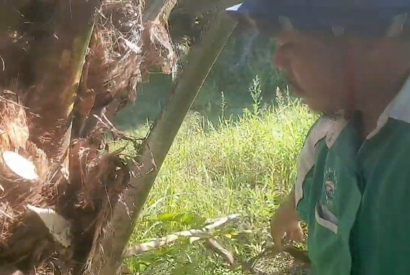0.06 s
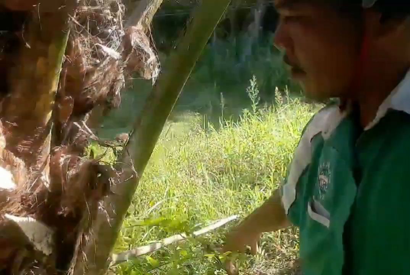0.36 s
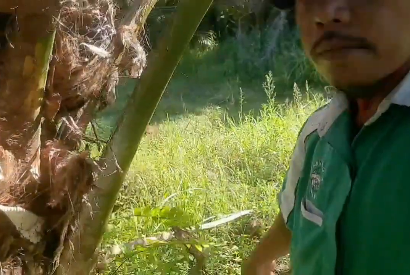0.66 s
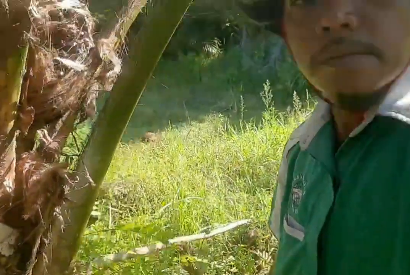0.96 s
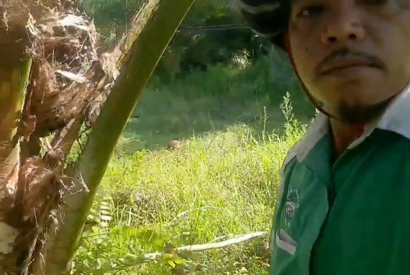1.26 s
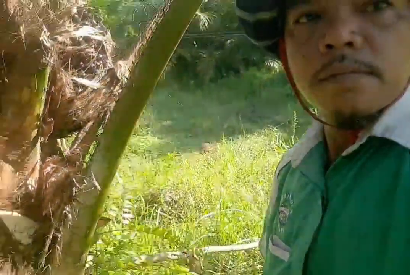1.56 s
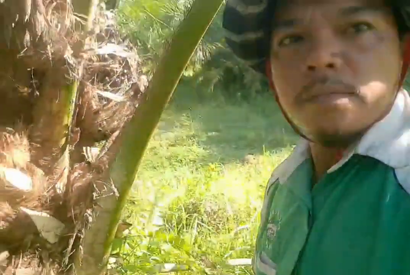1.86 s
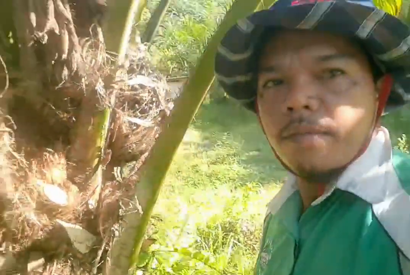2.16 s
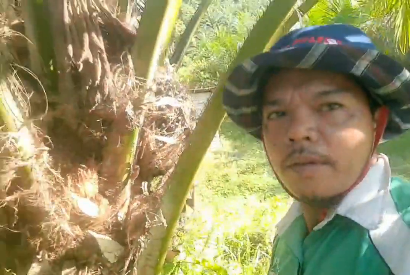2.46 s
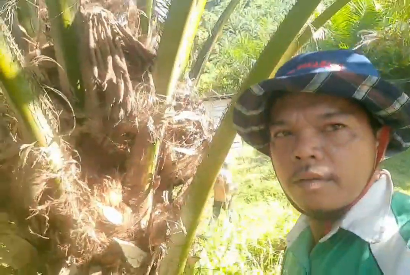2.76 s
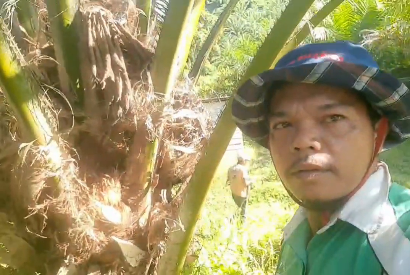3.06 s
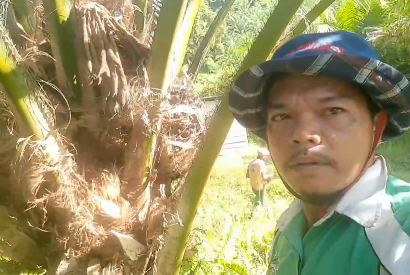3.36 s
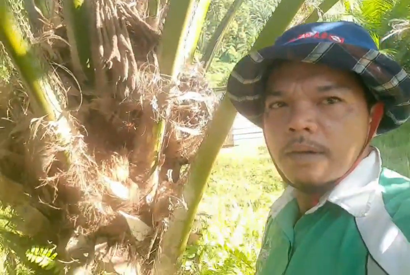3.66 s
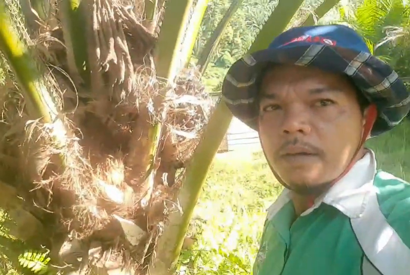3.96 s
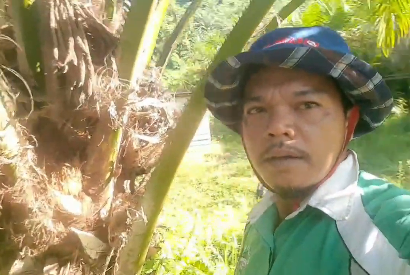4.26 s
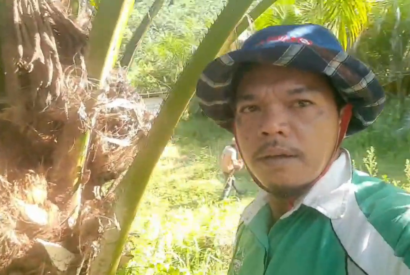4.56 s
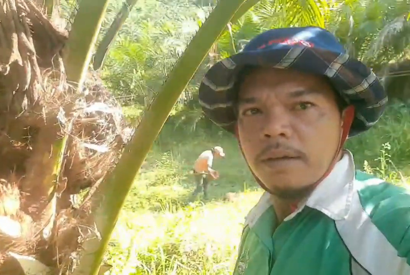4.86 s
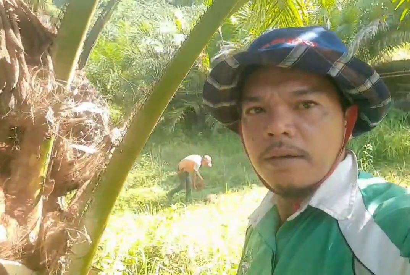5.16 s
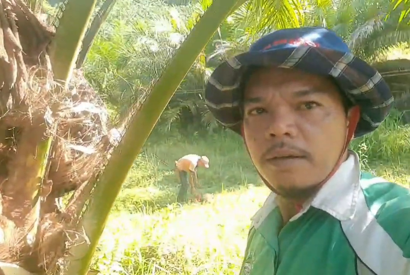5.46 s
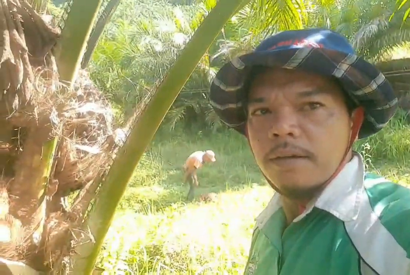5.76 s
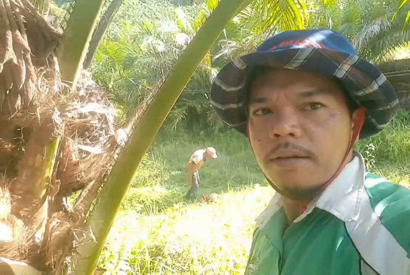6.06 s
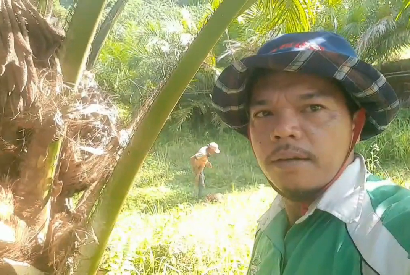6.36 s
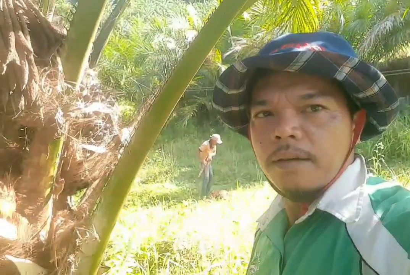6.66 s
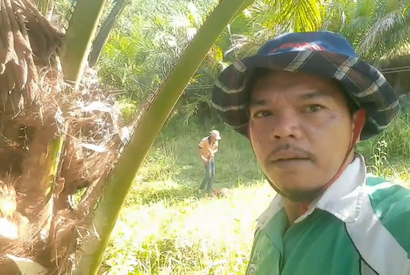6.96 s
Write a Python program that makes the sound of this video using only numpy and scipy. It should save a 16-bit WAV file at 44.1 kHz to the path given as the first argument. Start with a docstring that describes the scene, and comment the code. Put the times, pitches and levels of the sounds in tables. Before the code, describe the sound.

A close bird sings a thin, held whistle capped by a whip-like flick four times, adding a fast trill after the first and fourth, and just starts a fifth. Palm trunks scatter short echoes. Fingers on the phone make low rumbles, scuffs, one sharp early click and a cluster of heavier bumps late on. Behind it all, crickets pulse, distant birds chirp faintly and a soft rustling hiss gradually settles.

```python
"""Crickets, far birds and a soft rustling hiss fill a palm grove. Near by, a bird holds a thin whistle
and ends it in a whip; the hand on the phone makes one sharp click, and a fast trill follows.
Whistle and whip come twice more, scattered by trunks and fronds, over low bumps and scuffs of the hand.
The rustle settles, the heaviest bumps fall near 5.5 s, and the bird gives whistle, whip and trill again.
A fifth whistle has just begun at the end."""
import sys
import numpy as np
from scipy import signal
from scipy.fft import rfft, irfft, next_fast_len
from scipy.io import wavfile
from scipy.ndimage import uniform_filter1d, map_coordinates

SR = 44100
rng = np.random.default_rng(int(sys.argv[2]) if len(sys.argv) > 2 else 0)


def store_wav(level_fs):
    """Save 16-bit WAV to argv[1]."""
    pcm = np.round(np.clip(np.atleast_2d(level_fs), -1, 1) * 32767)
    wavfile.write(sys.argv[1], SR, pcm.T.astype(np.int16))


N = 317961
TIME = np.arange(N) / SR
BAND_EDGE_HZ = 15550

# Held whistles. Each row: start and end in seconds, base pitch and final rise in Hz, full level in dB,
# opening and final push against it in dB, time of a brief dip in seconds, dip in dB,
# left minus right in dB, lag of the right channel in cycles.
WHISTLES = [(0.497, 0.88, 2986, 49.3, -30, -11, 4.5, .595, -7.5, 2, 0.14),
            (1.45, 1.811, 2982, 90, -27, -2, 7, 1.602, -25, 3.5, 0.59),
            (3.421, 3.769, 2997, 87.4, -25.5, -10, 4.5, 3.57, -1.5, 0.5, 0.44),
            (5.746, 6.116, 2966, 83, -22.5, -19, 5, 6.072, -12, 10, 0.34),
            (7.067, 7.42, 3026, 59.5, -25, -8.5, 0, 7.158, -17, 5, 0.3)]
# Pitch arches of the whip, a trill's high opening note and its later notes. Each row: time in seconds
# and pitch in Hz (both before a note's factors), relative level in dB, roughness from 0 to 1.
WHIP_SHAPE = [(0, 1590, -12, 0.15), (.004, 2550, -2.5, 0.16), (.008, 3383, -2.5, 0.28),
              (.014, 4220, -8, 0.52), (.021, 3874, -9.5, 0.56), (.026, 4397, -3.5, 0.75),
              (.031, 4460, 0.5, 0.73), (.036, 2850, -1, .2), (.042, 2297, -0.5, 0.03),
              (.05, 1963, -9, 0.15), (.055, 1750, -18, 0.3)]
LEAD_SHAPE = [(0, 3610, -13, .1), (.005, 4265, -10.5, 0.2), (.012, 4560, -5.5, 0.25),
              (.016, 4170, -3, 0.35), (.02, 3000, -12.5, .2), (.026, 2300, -17, 0.2)]
CHIP_SHAPE = [(0, 2870, -8.5, 0.2), (.003, 3490, -1.5, 0.22), (.006, 3843, -5, 0.3),
              (.009, 3944, -1.5, 0.19), (.012, 3600, -9, .3), (.015, 2830, -8, 0.15), (.019, 2170, -15, 0)]
# Whips. Each row: start in seconds, relative level in dB, pitch factor, length factor,
# left minus right in dB.
WHIPS = [(.924, -26, 0.94, 0.97, 2.5), (1.848, -24, 0.95, 1.02, 0.5), (3.823, -23, 0.94, 1.02, 1.5),
         (6.166, -24, 0.95, 1.04, 2)]
# Trills. Each row: start, end and first note gap in seconds, relative level in dB, left minus right in dB.
TRILLS = [(1.135, 1.46, .0417, -17.5, 3), (6.346, 6.77, .042, -18, 4.5)]
# Fingers rubbing the case. Each row: middle and length in seconds, level in dB, left minus right in dB.
RUBS = [(0.597, 0.19, -40.5, 16), (0.974, .08, -43, -10), (1.17, 0.13, -36, 22), (1.36, 0.17, -41.5, 18),
        (1.923, 0.45, -44, 24), (2.39, 0.47, -40, 27), (2.92, 0.23, -43, -24), (3.617, 0.28, -33.5, 1),
        (3.802, 0.26, -31, 20), (4.104, 0.27, -39, -17), (4.347, 0.092, -45, -14), (4.702, 0.29, -45, -19),
        (5.29, 0.32, -51, -19), (5.638, 0.36, -35.5, 9), (5.9, 0.14, -37.5, 26), (6.28, 0.26, -47.5, 22),
        (6.457, 0.15, -43.5, -13), (6.66, 0.27, -47.5, 4), (6.932, 0.096, -49.5, 16)]
# Spectrum of the grip's rumble. Each row: frequency in Hz, relative density in dB.
RUMBLE_SPECTRUM = [(20, -37), (35, -1), (50, 2), (80, 1), (125, -7.5), (200, -21), (400, -27), (1200, -53),
                   (3000, -67)]
# Bumps on the case. Each row: start in seconds, relative level in dB, mid pitch in Hz,
# length in seconds, left minus right in dB.
BUMPS = [(0.46, -34, 62, 0.04, 26), (0.578, -38, 93, 0.044, 22), (1.647, -23.5, 79, 0.049, -35),
         (2.222, -29.5, 47.7, 0.071, 27), (2.336, -27, 60, 0.045, 28), (2.45, -34, 74.5, 0.03, 26),
         (2.899, -31, 85, 0.11, -30), (3.438, -29.5, 63.5, 0.075, 34), (3.736, -26, 77.4, 0.028, -10),
         (3.825, -30.5, 91, 0.061, 20), (3.997, -28.5, 79.4, 0.024, -26), (4.073, -21.5, 74.5, 0.032, -27),
         (4.425, -31, 82.6, 0.027, -27), (4.595, -30, 71, 0.02, -12), (4.683, -31, 65.4, 0.026, -24),
         (5.335, -31.5, 111, 0.018, -26), (5.428, -28.5, 69, 0.054, -12), (5.541, -16.5, 92.5, 0.015, -27),
         (5.559, -11.5, 123, 0.016, -34), (5.579, -25, 107, 0.02, -15), (5.639, -28, 86, 0.033, -15),
         (5.68, -18, 75, 0.037, 32)]
# Clicks, and scuffs of hand and cloth. Each row: start in seconds, level in dB, decay in seconds,
# tilt in dB per octave, left minus right in dB.
CLICKS = [(.068, -30, 0.0009, 14, -3), (.2425, -28, 0.0013, -11, 5), (.254, -25.5, 0.0014, -8, 4),
          (.9724, -3.5, .001, 5.5, 6), (3.34, -22, 0.00094, 4.5, 0)]
SCUFFS = [(.305, -38, .025, 5, 3), (.945, -41.5, .06, -11.5, 21), (3.565, -41.5, .15, -1.5, 2),
          (5.402, -32.5, .025, -1.5, 7), (5.438, -39.5, .02, -4.5, 3)]
# Slurs and coos of far birds. Each row: start and length in seconds, first and last pitch in Hz,
# relative level in dB.
FAR_NOTES = [(0.41, 0.061, 2107, 1890, -47), (0.833, 0.019, 2530, 1650, -42.5),
             (1.794, 0.019, 2880, 2300, -34), (1.975, 0.07, 2585, 1950, -40),
             (2.621, 0.046, 2760, 2360, -53), (3.026, .09, 2570, 2200, -55),
             (3.595, 0.079, 302, 321, -51.5), (3.808, 0.11, 315.5, 327, -50), (3.902, 0.062, 308, 341, -41),
             (4.232, 0.0347, 4280, 3400, -46), (4.229, 0.065, 311, 334, -53), (4.499, 0.088, 275, 265, -50),
             (6.042, 0.014, 2720, 2020, -40), (6.092, 0.01, 2610, 1950, -39)]
# Cricket bouts. Each row: start and end in seconds, pitch in Hz, chirps per second, level in dB.
CRICKET_BOUTS = [(0, 1.9, 7590, 15.6, -55), (1.93, 2.42, 7590, 15.6, -48.5), (2.56, 3.5, 7590, 15.6, -50),
                 (3.82, 4.39, 7590, 15.6, -50), (4.58, 5.2, 7590, 15.6, -52), (5.68, 6.7, 7590, 15.6, -56),
                 (0, 7.21, 6810, 14.2, -57)]
# Steady rustle, settling as the phone comes to rest. Each row: time in seconds, relative level in dB.
RUSTLE_BED = [(0, -43), (1.1, -44), (2.3, -40.5), (2.8, -48), (3.9, -47.5), (4.35, -52), (5.25, -56.5),
              (7.21, -52.5)]
# Swishes of sleeve and leaves. Each row: middle and length in seconds, relative level in dB.
SWISHES = [(.02, 0.23, -36.5), (.95, 0.24, -35.5), (1.464, 0.51, -36.5), (2.044, 0.42, -46),
           (2.987, 0.2, -40), (3.352, 0.26, -48), (3.66, 1, -44.5), (4.944, 0.32, -49.5),
           (5.504, 0.42, -43), (6.471, .4, -51), (7.159, .18, -51)]
# Spectra of the rustle and of the air and insect drone. Each row: frequency in Hz, relative density in dB.
RUSTLE_SPECTRUM = [(100, -4), (500, -7), (1200, -13), (2200, -2.5), (4400, 1), (6000, -0.5), (8500, 1),
                   (11000, 1), (15500, -1.5)]
DRONE_SPECTRUM = [(100, -13), (280, 6.5), (400, -5), (700, -6), (1300, -11), (1700, -2.5), (2300, 2.5),
                  (3400, -19), (4500, 6.5), (6000, -10), (8200, -0.5), (11000, -8), (15500, -36)]
# Bands of the insect chorus. Each row: centre and width in Hz, level in dB.
INSECT_BANDS = [(5110, 420, -52), (6730, 370, -50), (7330, 370, -53), (10320, 610, -58.5)]
# Reverberation of the grove. Each row: frequency in Hz, seconds to fall by 60 dB.
GROVE_T60 = [(300, .25), (2000, 0.22), (4000, 0.42), (8000, 0.21), (15000, 0.04)]


def bird(direct_db=-2.16):
    """Superposition: whistles, whips and trills arrive directly and again as echoes from the palms."""
    whips = chirps(WHIP_SHAPE, WHIPS)
    leads = chirps(LEAD_SHAPE, [(start, db, 1, 1, side_db) for start, _, _, db, side_db in TRILLS])
    trills = leads + chirps(CHIP_SHAPE, [note for row in TRILLS for note in trill_notes(*row)])
    direct = gain_of(direct_db) * from_left(whips + trills, samples=3)
    echoes = grove(whips, -3.5, -9, near_t60=.075) + grove(trills, -3.5, -11, near_t60=.085)
    return whistles() + direct + echoes


def whistles(slide_hz=1300, slide_s=.009, settle_hz=360, settle_s=.052, opening_s=.053, swell_s=.085):
    """Exponential relaxation: a pure tone drops onto its note and swells, then lifts at the end."""
    slides, held, lifts = np.zeros((3, 2, N))
    for start, end, base_hz, rise_hz, full_db, soft_db, push_db, dip_at, dip_db, side_db, lag in WHISTLES:
        t = np.arange(0, end - start, 1 / SR)
        lifting = (t / t[-1]) ** 7
        hz = base_hz + slide_hz * np.exp(-t / slide_s) + settle_hz * np.exp(-t / settle_s)
        hz += rise_hz * lifting + 4 * drift(62.2, len(t))
        db = full_db + soft_db * np.exp(-np.maximum(t - opening_s, 0) / swell_s)
        db += push_db * lifting + dip_db * hump(start + t, dip_at, .054) + 2 * drift(97.9, len(t))
        release = np.minimum((t[-1] - t) / .008, 1)
        pair = release * np.array([tone(hz, db, .02), tone(hz, db, .02, lag)])
        sway_db = 4 * drift(28, len(t))
        note = placed(pair, side_db + sway_db)
        sliding = np.exp(-t / .046)
        add(slides, start, note * sliding)
        add(held, start, note * (1 - sliding))
        add(lifts, start, note * lifting)
    # echoes merge with the held note, but stand apart and beat where its pitch moves
    echoes = grove(slides, 1.2, -5) + grove(lifts, -10, -9) + grove(held, -20, -22)
    return held + .5 * slides + echoes


def chirps(shape, notes, overtone_db=-8):
    """Frequency modulation: each note sweeps through one arch, roughened by a fast shake of pitch."""
    out = np.zeros((2, N))
    at, hz, db, roughness = np.transpose(shape)
    for start, level_db, pitch, stretch, side_db in notes:
        t = np.arange(0, at[-1], 1 / (SR * stretch))
        shake = .1 * np.interp(t, at, roughness) * drift(1100, len(t))
        glide_hz = uniform_filter1d(np.interp(t, at, hz), size=80) * pitch * (1 + shake)
        note_db = np.interp(t, at, db) + level_db
        # the throat passes the second harmonic only while the pitch is low
        overtone = tone(2 * glide_hz, note_db + overtone_db, .068) / (1 + (glide_hz / 2500) ** 20)
        add(out, start, placed(tone(glide_hz, note_db, .093) + overtone, side_db))
    return out


def trill_notes(start, end, gap, db, side_db, slowing=.00071, tiring_s=.4, pitch=1.017):
    """Fatigue: as the bird tires, its train of notes slows and grows softer, lower and shorter."""
    count = np.arange(1, int((end - start) / gap) + 1)
    onsets = gap * count * (1 + slowing * count ** 2)
    onsets = onsets[onsets < end - start]
    fatigue = np.minimum(onsets / tiring_s, 1) ** 5
    return [(start + t, db - 7 * tired, pitch * (1 - .1085 * tired), 1 - .193 * tired, side_db)
            for t, tired in zip(onsets, fatigue)]


def grove(x, near_db, far_db, near_t60=.064, echoes_per_s=2500):
    """Multiple scattering: near trunks return a short burst of echoes, the trees beyond a longer tail."""
    t = np.arange(SR * 3 // 4) / SR
    near, far = rng.standard_normal((2, 2, len(t))) * (rng.random((2, 2, len(t))) < echoes_per_s / SR)
    near = near * (t > .002) * gain_of(-60 * t / near_t60)
    hz, when, spectrum = signal.stft(far * np.minimum(t / .019, 1), SR, nperseg=256)
    decay = gain_of(-60 * when / at_frequency(GROVE_T60, hz)[:, None])
    far = signal.istft(spectrum * decay, SR, nperseg=256)[1][:, :len(t)]
    response = (gain_of(near_db) * unit_rms(near) + gain_of(far_db) * unit_rms(far)) / np.sqrt(len(t))
    return signal.fftconvolve(x, response, axes=1)[:, :N]


def grip_rumble(resting_db=-58, restless_db=3, lumpy_db=3.5):
    """Structure-borne sound: shifting fingers shake the case, and each rub adds to the rumble's power."""
    power = gain_of(resting_db + restless_db * np.array([drift(19, N), drift(5.2, N)])) ** 2
    for middle, length, db, side_db in RUBS:
        power += placed(gain_of(db) * hump(TIME, middle, length), side_db) ** 2
    rumble = noise(lambda f: at_frequency(RUMBLE_SPECTRUM, f), .11, N)
    return rumble * np.sqrt(power) * gain_of(lumpy_db * drift(25, N))


def bumps(trim_db=-1):
    """Transient vibration: a push shakes the case for a few falling cycles, mostly at one microphone."""
    out = np.zeros((2, N))
    for start, db, hz, length, side_db in BUMPS:
        progress = np.arange(0, 1, 1 / (SR * length))
        envelope = np.sin(np.pi * progress ** .7) ** 1.5
        vibration = np.sin(2 * np.pi * np.cumsum(hz * (1.2 - .4 * progress)) / SR)
        add(out, start, placed(gain_of(db + trim_db) * envelope * vibration, side_db))
    return out


def contact_bursts(rows, low_cut_hz, attack_share):
    """Exponential decay: each click or scuff is a dying puff of noise with its bass cut away."""
    out = np.zeros((2, N))
    for start, db, decay, tilt_db, side_db in rows:
        def colour(f):
            bass_loss_db = 10 * np.log10(1 + (low_cut_hz / (f + 1)) ** 6)
            return tilt_db * np.log2(f + 1) - bass_loss_db - 60 * (f > BAND_EDGE_HZ)
        t = np.arange(0, 6 * decay, 1 / SR)
        envelope = np.exp(-t / decay) * (1 - np.exp(-t / (attack_share * decay)))
        add(out, start, placed(gain_of(db) * envelope * noise(colour, .9, len(t)), side_db))
    return out


def far_birds(direct_db=-5, waver=.035):
    """Reverberant blur: far slurs and low coos carry more energy in their echoes than directly."""
    out = np.zeros((2, N))
    for start, length, first_hz, last_hz, db in list(FAR_NOTES) + chatter():
        hz = np.geomspace(first_hz, last_hz, round(length * SR))
        hz *= 1 + waver * drift(400, len(hz))
        add(out, start, placed(tone(hz, db, .6), side_db=2))
    return gain_of(direct_db) * out + grove(out, near_db=-4, far_db=-8)


def chatter(per_s=14, low_hz=2100, high_hz=2850, fall=.173):
    """A Poisson process: birds deep in the grove add falling slurs at chance times."""
    wait, length, pitch, level = rng.random((200, 4)).T
    starts = np.cumsum(-np.log(1 - wait)) / per_s
    hz = low_hz + (high_hz - low_hz) * pitch
    notes = zip(starts, .02 + .04 * length, hz, hz * (1 - fall), -63 + 6 * level)
    return [note for note in notes if note[0] < N / SR]


def crickets(sag_hz=170, duty=.57):
    """Amplitude modulation: a high tone pulses in short chirps, each sagging in pitch."""
    out = np.zeros((2, N))
    for start, end, hz, rate, db in CRICKET_BOUTS:
        size = round((end - start) * SR)
        cycle = np.cumsum(rate * (1 + .028 * drift(4, size))) / SR % 1
        progress = np.minimum(cycle / duty, 1)
        chirp_hz = hz - sag_hz * (progress - .5) + 25 * drift(300, size)
        carrier = tone(chirp_hz, db + 1.2 * drift(8, size), .03)
        add(out, start, placed(carrier * np.sin(np.pi * progress), side_db=1))
    return out + grove(out, near_db=-3, far_db=-8)


def rustle(trim_db=2.03, flicker_db=1.09, crackle_db=-10, snaps_per_s=500):
    """Incoherent addition: swishes of sleeve and leaves add in power to a finely crackling hiss."""
    power = gain_of(np.interp(TIME, *np.transpose(RUSTLE_BED))) ** 2
    for middle, length, db in SWISHES:
        power += (gain_of(db) * hump(TIME, middle, length)) ** 2
    snaps = (rng.random(N) < snaps_per_s / SR) * gain_of(3 * np.minimum(rng.exponential(1, N), 5))
    crackle = gain_of(crackle_db) * unit_rms(uniform_filter1d(snaps, size=24))
    hiss = noise(lambda f: at_frequency(RUSTLE_SPECTRUM, f), .087, N)
    envelope = np.sqrt(power * (1 + crackle ** 2)) * gain_of(trim_db + flicker_db * drift(150, N))
    return placed(hiss * envelope, side_db=1.45)


def air_and_insects(drone_db=-51.5, flicker_db=1.47):
    """A diffuse field: far insects merge into narrow bands of noise above the steady air."""
    air = gain_of(drone_db) * noise(lambda f: at_frequency(DRONE_SPECTRUM, f), .24, N)
    for hz, width, db in INSECT_BANDS:
        band = noise(lambda f: -20 * np.log10(1 + 2 * ((f - hz) / width) ** 2), .056, N)
        air += band * gain_of(db + flicker_db * drift(30, N))
    return placed(air, side_db=3.1)


def tone(hz, db, taper_share, lag_cycles=0):
    """Phase is the integral of frequency: a sine with tapered ends."""
    phase = 2 * np.pi * (np.cumsum(hz) / SR - lag_cycles)
    return np.sqrt(2) * gain_of(db) * np.sin(phase) * signal.windows.tukey(len(hz), taper_share)


def noise(colour, coherence, size):
    """Partly coherent noise: the ears share some of its power; colour gives dB from Hz."""
    left, right, common = rng.standard_normal((3, next_fast_len(size)))
    white = np.sqrt(1 - coherence) * np.array([left, right]) + np.sqrt(coherence) * common
    hz = np.fft.rfftfreq(len(left), 1 / SR)
    return unit_rms(irfft(rfft(white) * gain_of(colour(hz)), len(left))[:, :size])


def drift(per_s, size):
    """Spline interpolation of random values: a smooth wander of about unit size."""
    knots = rng.standard_normal(size // 64 + 200)
    return map_coordinates(knots, [np.arange(size) * per_s / SR], mode="mirror")


def hump(t, middle, length):
    """A Gaussian of height one, about `length` wide at its foot."""
    return np.exp(-8 * ((t - middle) / length) ** 2)


def placed(x, side_db):
    """Constant-power panning: left exceeds right by side_db."""
    ratio = gain_of(side_db) * np.ones(x.shape[-1])
    return x * np.array([ratio, np.ones_like(ratio)]) * np.sqrt(2 / (1 + ratio ** 2))


def from_left(x, samples):
    """Path difference: sound reaches the right microphone after the left."""
    return np.array([x[0], np.pad(x[1], (samples, 0))[:N]])


def add(mix, start, sound):
    """Superposes a stereo sound from `start` seconds on."""
    part = mix[:, max(round(start * SR), 0):][:, :sound.shape[1]]
    part += sound[:, :part.shape[1]]


def at_frequency(points, hz):
    """Interpolation on a log-frequency axis."""
    f, value = np.transpose(points)
    return np.interp(np.log(hz + 1), np.log(f + 1), value)


def gain_of(db):
    """Decibels to amplitude."""
    return 10 ** (np.asarray(db) / 20)


def unit_rms(x):
    """Normalisation to a mean power of one."""
    return x / np.sqrt(np.mean(x ** 2) + 1e-20)


def scene():
    """Linear superposition of the bird, the life of the grove and the hand on the phone."""
    clicks = contact_bursts(CLICKS, low_cut_hz=2050, attack_share=.025)
    clicks = from_left(clicks, samples=1) + grove(clicks, near_db=-6, far_db=-15)
    hand = clicks + grip_rumble() + bumps() + contact_bursts(SCUFFS, low_cut_hz=316, attack_share=.13)
    return bird() + far_birds() + crickets() + air_and_insects() + rustle() + hand


def record(dry):
    """Soft saturation rounds the highest peaks, and a low-pass filter limits the band."""
    rounded = .95 * np.tanh(dry / .95)
    low_pass = signal.firwin(511, BAND_EDGE_HZ, window=("kaiser", 9), fs=SR)
    return signal.oaconvolve(rounded, low_pass[None], "same")


dry = scene()
out = record(dry)
store_wav(out)
```